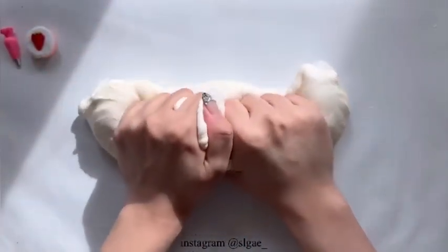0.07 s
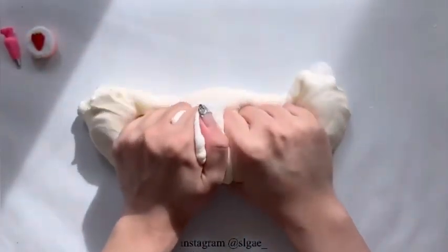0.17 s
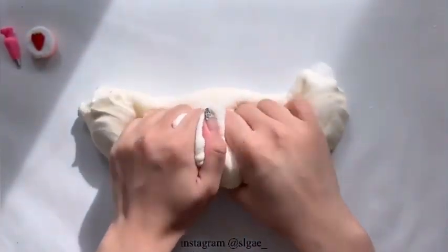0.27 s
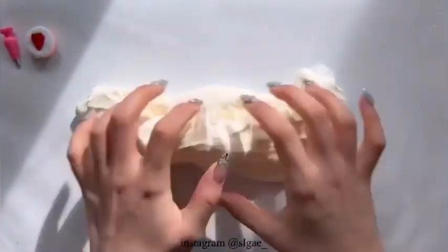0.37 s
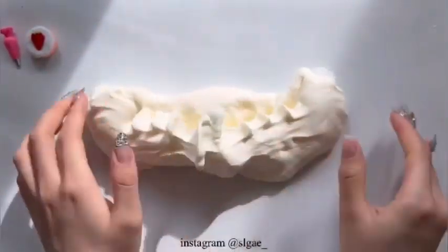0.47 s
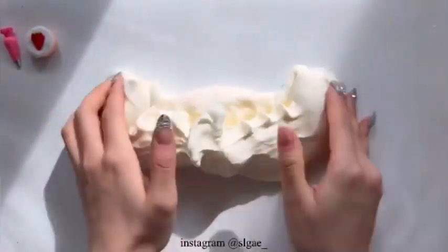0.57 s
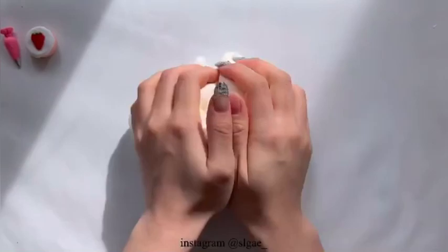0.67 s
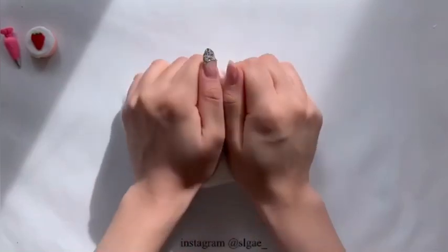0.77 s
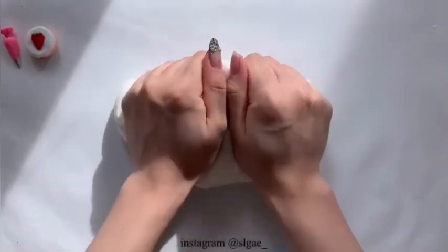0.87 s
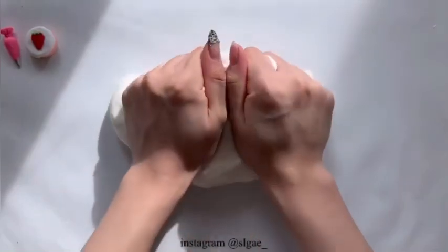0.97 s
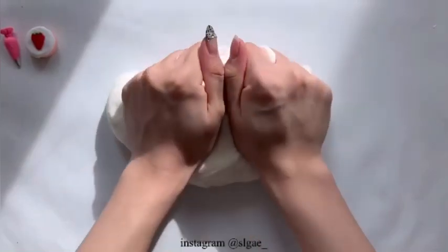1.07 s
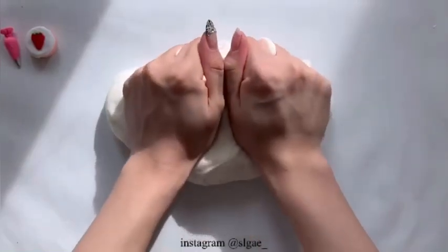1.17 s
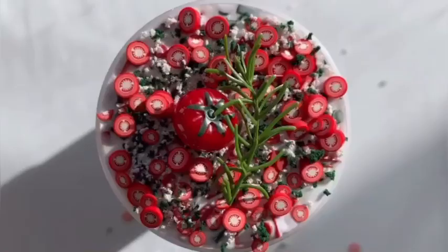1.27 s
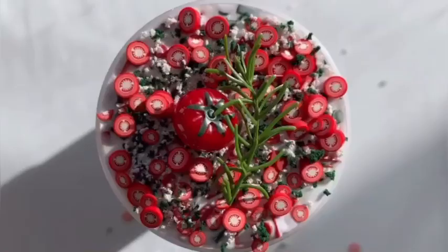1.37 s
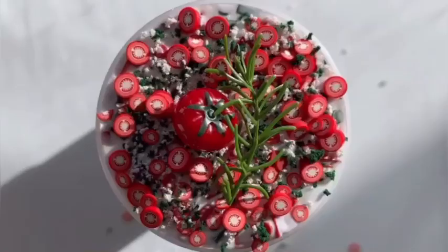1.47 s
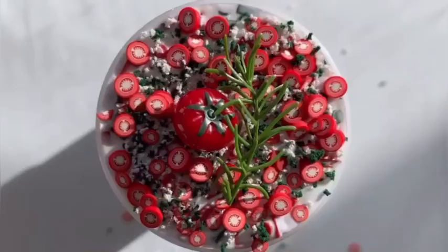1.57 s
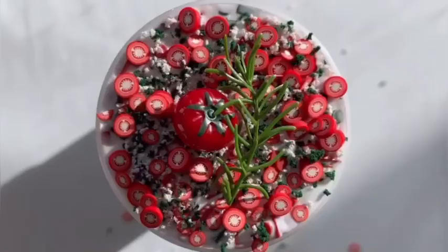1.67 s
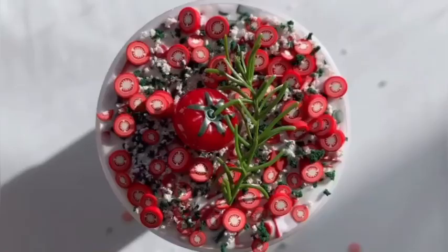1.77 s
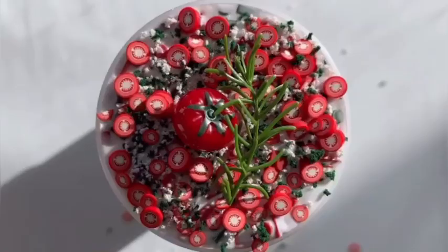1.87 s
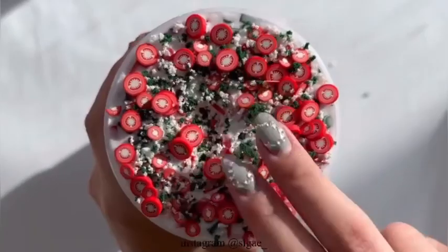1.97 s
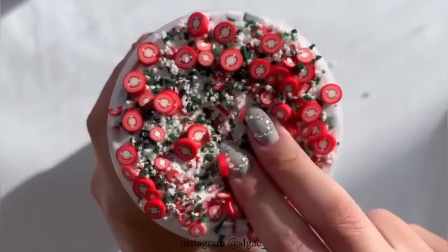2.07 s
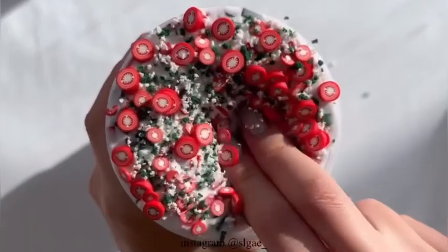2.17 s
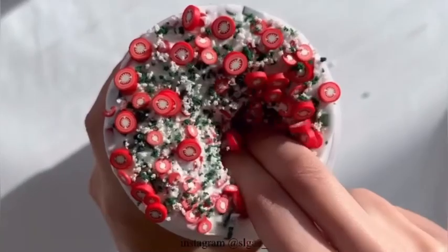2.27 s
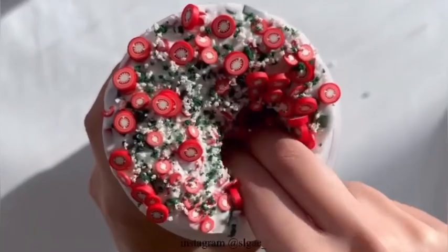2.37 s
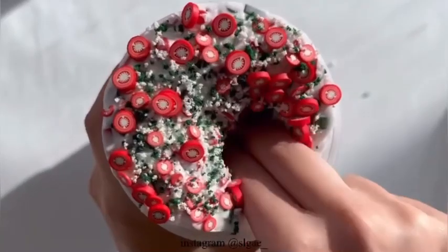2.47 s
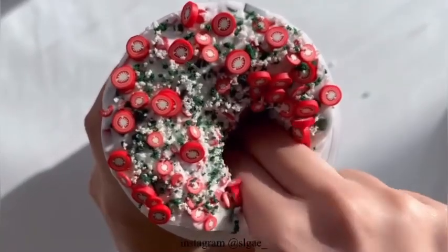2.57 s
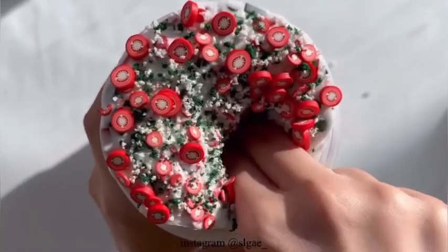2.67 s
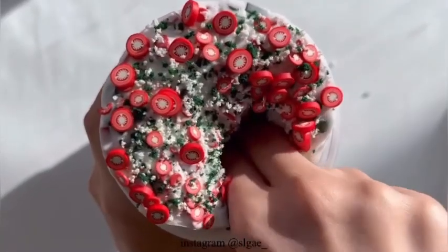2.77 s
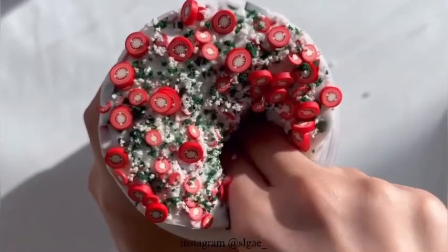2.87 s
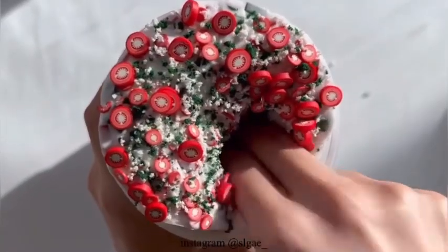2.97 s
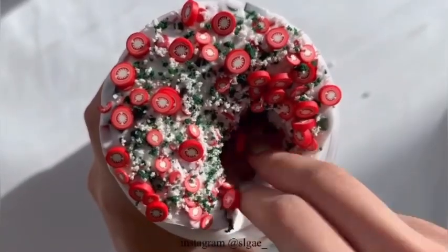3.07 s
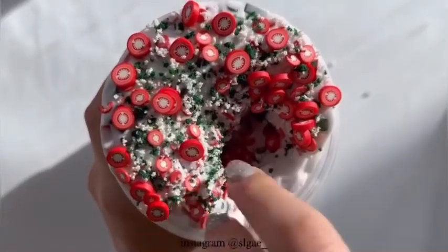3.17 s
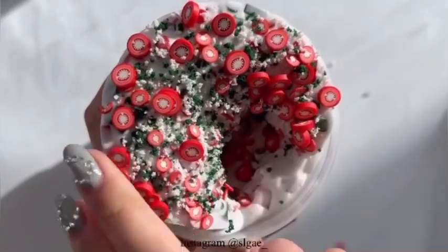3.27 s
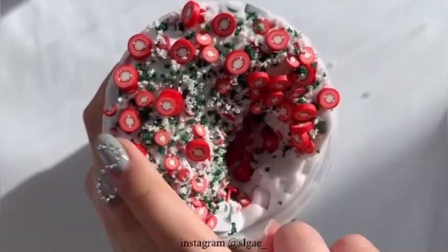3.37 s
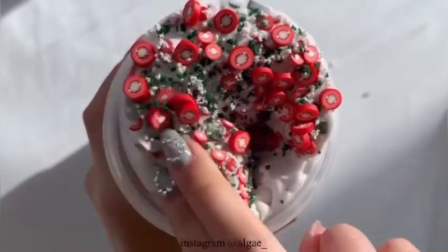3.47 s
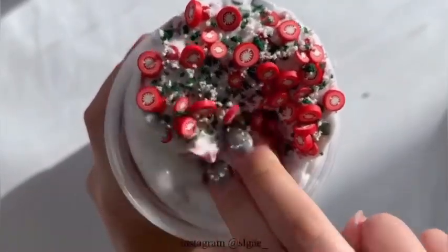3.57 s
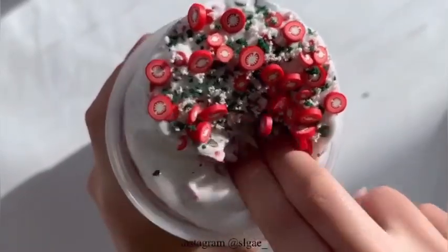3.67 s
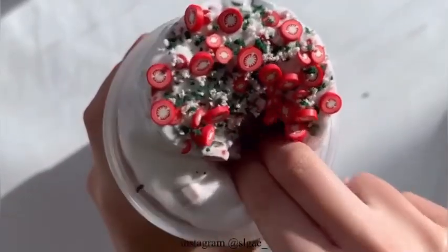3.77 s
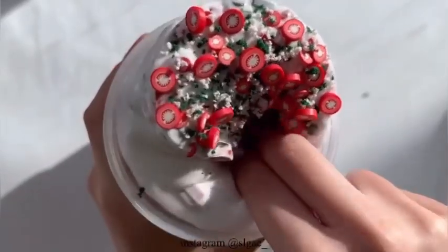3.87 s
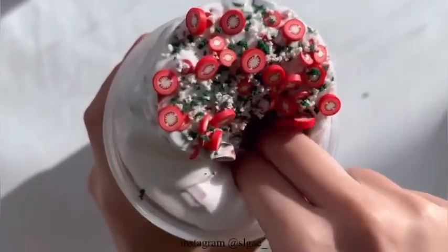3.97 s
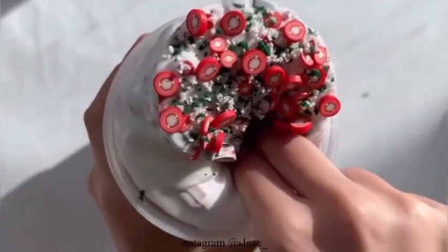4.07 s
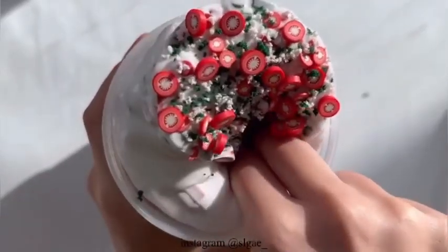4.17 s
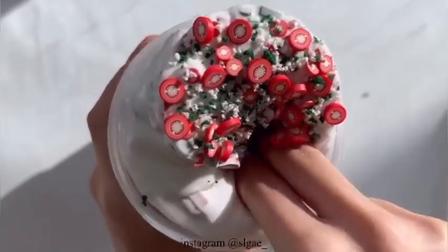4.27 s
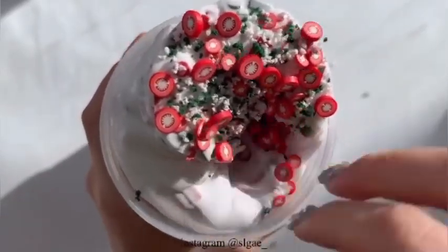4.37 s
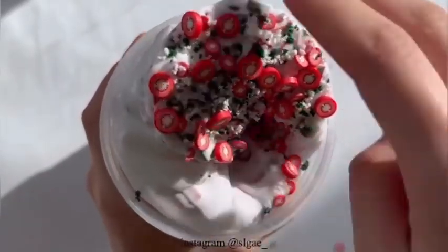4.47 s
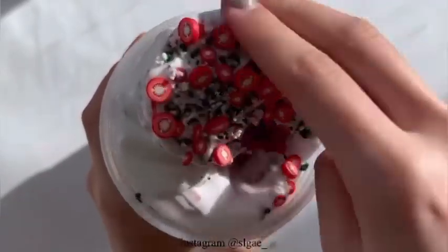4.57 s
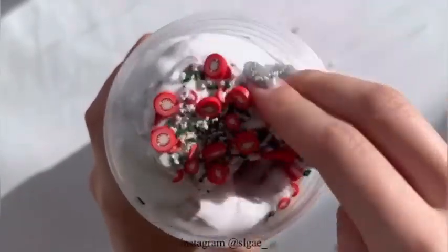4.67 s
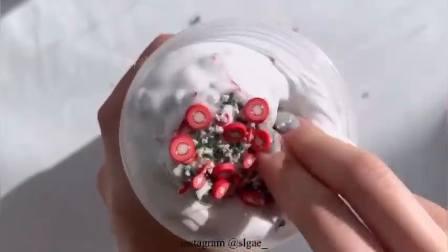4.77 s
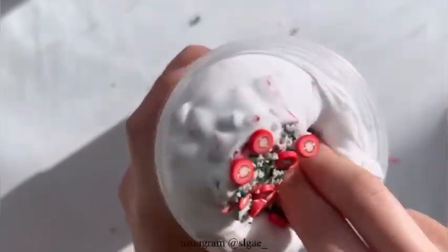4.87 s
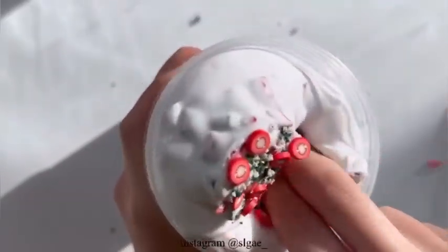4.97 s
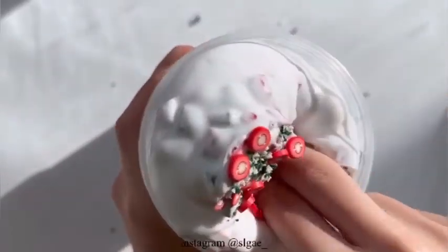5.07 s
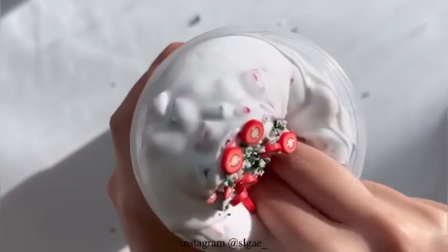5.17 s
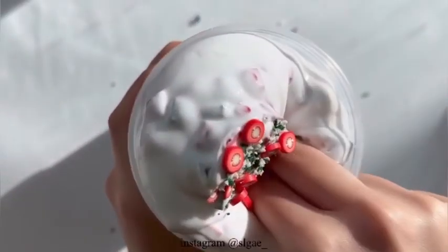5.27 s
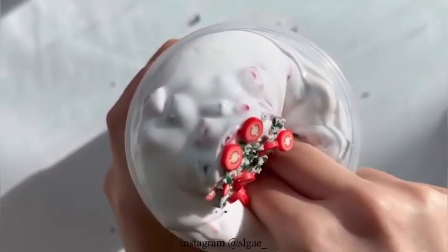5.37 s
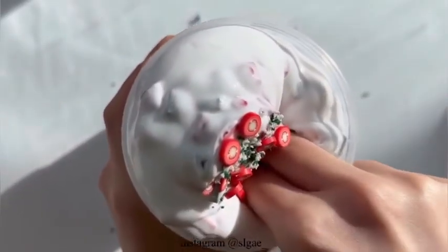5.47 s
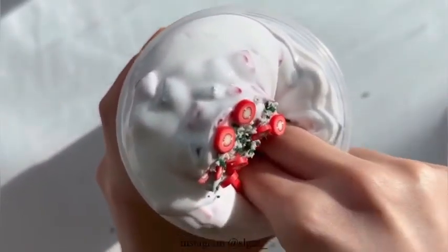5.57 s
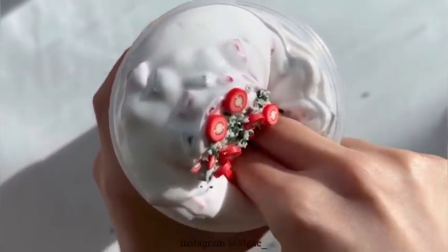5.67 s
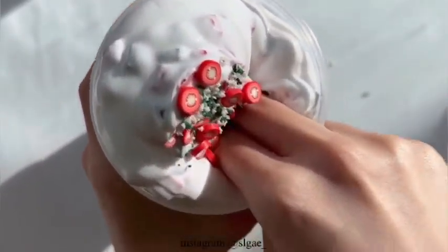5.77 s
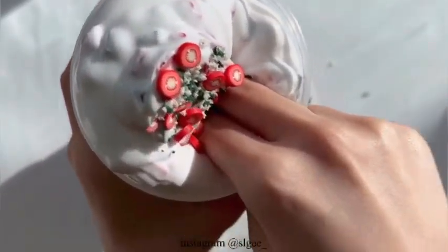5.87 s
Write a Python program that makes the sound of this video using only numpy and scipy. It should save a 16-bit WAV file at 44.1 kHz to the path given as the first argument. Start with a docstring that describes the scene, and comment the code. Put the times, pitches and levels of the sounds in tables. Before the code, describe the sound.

Thick slime squeezed on a table very close to the microphone: fizzing film tears, wet pops and deep hollow thumps over low squelch. It cuts to silence for a moment after one second. Then fingers poke slime in a hand-held cup, with finer gritty crackles, sticky clicks, soft thumps and a tiny air squirt, in a small dry room with faint low hum.

```python
"""Slime on a table, heard close up through two microphone ports, over a low room rumble with a hum.
First, hands knead a thick slab: pockets pop as damped rings, deep ones thump, torn films fizz as noise grains.
A muted cut falls silent at about 1.1 s. Then fingers poke slime in a hand-held cup: more pops and thumps,
grittier fizz, and at 3.2 s a short falling squirt of air. Noise swells low as the mass squelches in both parts."""
import sys
import numpy as np
from scipy import signal
from scipy.fft import rfft, irfft
from scipy.io import wavfile
from scipy.ndimage import uniform_filter1d

SR = 44100
rng = np.random.default_rng(int(sys.argv[2]) if len(sys.argv) > 2 else 0)


def master_out(mix):
    """Clip the mix to full scale and print it as 16-bit PCM to the path in sys.argv[1]."""
    frames = np.transpose(np.atleast_2d(mix))
    ceiling = np.clip(frames, -1, 1)
    pcm = np.round(ceiling * 32767).astype(np.int16)
    wavfile.write(sys.argv[1], SR, pcm)


N = 261072


def amp(db):
    """Decibels to gain."""
    return 10 ** (np.asarray(db) / 20)


def evened(x):
    """Scales to rms 1."""
    return x / np.sqrt(np.mean(x ** 2) + 1e-20)


def read(points, hz):
    """Reads a (frequency, value) table on a log frequency axis."""
    table_hz, value = np.transpose(points)
    return np.interp(np.log(hz + 1), np.log(table_hz + 1), value)


def curve(rows):
    """Columns of a (time, value, ..) table at every sample."""
    time_s, *columns = np.transpose(rows)
    return [np.interp(np.arange(N) / SR, time_s, column) for column in columns]


def add(mix, start_s, sound):
    """Mixes a sound in at its start time."""
    part = mix[max(round(start_s * SR), 0):][:len(sound)]
    part += sound[:len(part)]


def colour(x, points):
    """Gives x the tilt of a spectrum table, then rms 1."""
    hz = np.fft.rfftfreq(len(x), 1 / SR)
    return evened(irfft(rfft(x) * amp(read(points, hz)), len(x)))


def band(x, lo_hz, hi_hz, order=2):
    """Causal band-pass."""
    edges = [lo_hz, min(hi_hz, SR / 2.1)]
    return signal.sosfilt(signal.butter(order, edges, btype="band", fs=SR, output="sos"), x)


# Spectrum of the rumble in the room: pitch_hz [Hz], level_db [relative dB per Hz]
RUMBLE_SPECTRUM = [(20, -37.5), (30, -24.5), (42, -12), (61, -5.5), (72, 0), (86, -8.5), (120, -7.5),
                   (147, -23), (216, -25.5), (320, -33.5), (580, -30), (800, -41), (1300, -44), (3000, -68)]
RUMBLE_DB, HUM_DB = -47, -48.5  # rms levels
HUM_HZ, WAVER_HZ = 61.7, 3.5  # mean pitch and rms pitch deviation


def rumble():
    """Steady low noise of the room with a hum in it whose pitch wavers at random."""
    waver = evened(uniform_filter1d(uniform_filter1d(rng.standard_normal(N), 2500), 2500))
    hum = np.sqrt(2) * np.sin(2 * np.pi * np.cumsum(HUM_HZ + WAVER_HZ * waver) / SR)
    noise = colour(rng.standard_normal(N), RUMBLE_SPECTRUM)
    return amp(RUMBLE_DB) * noise + amp(HUM_DB) * hum


# Decay of the room: pitch_hz [Hz], t60_s [s]
ROOM_DECAY = [(500, 0.095), (2500, 0.14), (8000, 0.088)]


def room(x):
    """Sparse taps of random sign whose bands die at their own speed."""
    taps = np.zeros(SR // 4)
    at = np.arange(100, SR // 4 - 20, 20)
    taps[at + rng.integers(0, 20, len(at))] = rng.choice([-1., 1.], len(at))
    hz, t, bins = signal.stft(taps, SR, nperseg=256)
    fading = bins * amp(-60 * t / read(ROOM_DECAY, hz)[:, None])
    tail = signal.istft(fading, SR, nperseg=256)[1]
    return signal.fftconvolve(x, tail / np.linalg.norm(tail))[:N]


# The hole round the fingers, resounding with fizz and pops: time_s [s], pitch_hz [Hz], gain_db [dB]
HOLE = [(2.0, 2460, -11.5), (2.25, 2380, 0), (2.72, 2560, 2), (2.84, 1510, 10.5), (3.38, 1590, 6.5),
        (3.5, 2450, -12), (4.9, 2510, 5), (5.2, 2000, -24)]


def hollow(x, width_hz=180):
    """A resonance that follows the size of the hole: shift down, smooth, shift back."""
    hz, gain_db = curve(HOLE)
    turn = np.exp(2j * np.pi * np.cumsum(hz) / SR)
    r = np.exp(-np.pi * width_hz / SR)
    smooth = signal.lfilter([1 - r], [1, -r], x / turn)
    return amp(gain_db) * 2 * (turn * smooth).real


# Slow fizz of the settling mass: time_s [s], fizz_db [dB], treble_db [dB over fizz]
SETTLING = [(0.0, -49, -11.5), (0.27, -70.5, -5.5), (0.5, -39.5, -10), (0.76, -53.5, -10), (0.9, -68.5, -6),
            (1.3, -80, -6.5), (1.83, -77, -6.5), (2.03, -57.5, 4), (2.52, -59.5, -8.5), (2.75, -83, 4.5),
            (3.17, -79, 1), (3.43, -56, 6.5), (3.7, -55.5, -1.5), (4.06, -69.5, -6), (4.25, -62, 1),
            (4.47, -68, 0), (4.54, -56.5, 9), (4.72, -51, 0), (4.85, -60.5, 3.5), (5.07, -59, -13.5),
            (5.28, -80, -8), (5.69, -61.5, -5.5), (5.78, -73, -2.5), (5.92, -73, -16)]
# Films tearing in one go: peak_s [s], fizz_db [dB], treble_db [dB over fizz],
# swell_s and fade_s [s per 20 dB, short ones held to a floor]
FILM_TEARS = [(0.116, -33, -9.5, 0.09, 0.064), (0.302, -26, -12.5, 0.0035, 0.12),
              (0.432, -31.5, 0.5, 0.0042, 0.042), (0.454, -25, -7.5, 0.048, 0.027),
              (0.574, -45.5, -11, 0.035, 0.12), (0.692, -37, -9.5, 0.041, 0.15),
              (1.07, -48.5, -5, 0.15, 0.12), (1.49, -73.5, 3.5, 0.044, 0.067),
              (1.859, -45, -7, 0.012, 0.031), (2.088, -33, -13, 0.02, 0.018),
              (2.205, -51.5, 3, 0.14, 0.095), (2.859, -43, 1.5, 0.056, 0.073),
              (3.272, -49.5, 1, 0.015, 0.033), (3.332, -59, 3, 0.16, 0.052), (3.832, -51.5, -8, 0.48, 0.04),
              (4.135, -48.5, -3, 0.042, 0.06), (4.17, -42, 5.5, 0.046, 0.05),
              (4.502, -23, 2, 0.0036, 0.037), (4.666, -24.5, -7, 0.0048, 0.036),
              (5.143, -49, -10.5, 0.042, 0.052), (5.373, -52.5, -13, 0.08, 0.39),
              (5.597, -56.5, -15, .05, 0.068)]


def tearing():
    """Gains of fizz and its treble: each tear swells to its peak and fades, over the settling mass."""
    fizz_db, treble_db = curve(SETTLING)
    low_power, high_power = amp(2 * fizz_db), amp(2 * (fizz_db + treble_db))
    t = np.arange(N) / SR
    for peak_s, db, treble_db, swell_s, fade_s in FILM_TEARS:
        away = np.maximum((peak_s - t) / max(swell_s, .004), (t - peak_s) / max(fade_s, .01))
        power = amp(2 * db - 2 * 20 * away)
        low_power = low_power + power
        high_power = high_power + power * amp(2 * treble_db)
    return np.sqrt(low_power), np.sqrt(high_power)


def crackle(per_s, spread_db, cycles, lo_hz, hi_hz, count=24):
    """Tiny random bursts of many pitches; few are large."""
    size = amp(spread_db * np.minimum(rng.exponential(1, N), 4)) * (rng.random(N) < per_s / SR)
    kind, out = rng.integers(0, count, N), np.zeros(N)
    for k, hz in enumerate(np.geomspace(lo_hz, hi_hz, count)):
        u = np.arange(int(6 * cycles * SR / hz)) * hz / SR  # time in cycles
        grain = np.sin(2 * np.pi * u) * np.exp(-u / cycles)
        out += signal.oaconvolve(size * (kind == k), grain / np.linalg.norm(grain))[:N]
    return evened(out)


def patchy(x, patchy_db=1.8):
    """The fizz's level drifts at random in short patches of pitch and time."""
    bins = signal.stft(x, nperseg=256)[2]
    patches = uniform_filter1d(rng.standard_normal(bins.T.shape), size=10, axis=0)
    patches = uniform_filter1d(patches, size=5, axis=1)
    return signal.istft(bins * amp(patchy_db * evened(patches).T), nperseg=256)[1][:N]


# Spectrum of the fizz, before body and treble are levelled apart: pitch_hz [Hz], level_db [relative dB per Hz]
FIZZ_SPECTRUM = [(290, -22), (500, 0), (637, 0), (1030, -5), (1500, -6), (5620, -7), (9010, -3.5),
                 (9980, -21), (10500, -41)]
# Grit of the fizz, from smooth hiss to separate ticks: time_s [s], share [0-1]
GRIT_SHARE = [(0, .35), (1.3, .3), (1.82, .05), (1.9, .9), (4.49, .9), (4.51, .4), (4.7, .6), (4.95, .8),
              (5.2, .4), (5.92, .3)]
# Spectrum of the squelch, shaping lumpy noise: pitch_hz [Hz], level_db [relative dB per Hz]
SQUELCH_SPECTRUM = [(65, -52.5), (110, -10), (232, 1.5), (332, -7), (382, 1), (474, -17), (800, -9),
                    (1200, -80)]
# Low squelch of the moving mass, one list for the slab and one for the cup: time_s [s], level_db [dB]
PRESSES = [
    [(0.01, -56), (0.666, -44), (1.05, -60.5)],
    [(1.45, -73.5), (1.78, -62), (2.25, -37.5), (2.7, -55.5), (3.19, -59.5), (3.75, -45), (4.52, -61.5),
     (4.66, -48), (5.92, -56)],
]


def knead():
    """Fizz of tearing films over a soft hiss, and the low squelch of the moving mass."""
    low, treble = tearing()
    grit = curve(GRIT_SHARE)[0]
    ticks = crackle(2200, 4.2, 1.5, 1100, 5500)
    grains = grit * ticks + np.sqrt(1 - grit ** 2) * rng.standard_normal(N)
    spectrum = rfft(colour(patchy(grains), FIZZ_SPECTRUM))
    high = 1 / (1 + (5000 / (np.fft.rfftfreq(N, 1 / SR) + 1)) ** 10)  # splits body from treble at 5 kHz
    body = evened(irfft(spectrum * (1 - high), N))
    bright = evened(irfft(spectrum * high, N))
    fizz = low * (body + hollow(body)) + treble * bright
    lumps = crackle(300, 2.5, 2, 130, 600) + .8 * rng.standard_normal(N)
    return fizz + amp(curve(np.concatenate(PRESSES))[0]) * colour(lumps, SQUELCH_SPECTRUM)


# Air hissing out of a narrow slit: start_s [s], end_s [s], level_db [dB before the swell],
# from_hz [Hz], to_hz [Hz]
SLIT = (3.243, 3.28, -31, 7310, 5808)


def squirt():
    """A fluttering hiss in one falling resonance that swells and is cut off as the slit bursts."""
    start_s, end_s, db, from_hz, to_hz = SLIT
    out, u = np.zeros(N), np.linspace(0, 1, round((end_s - start_s) * SR))
    noise = rng.standard_normal((3, 2000))[:, :len(u)]
    narrow = band(noise[0] + 1j * noise[1], 20, 670)
    turn = np.exp(2j * np.pi * np.cumsum(from_hz + (to_hz - from_hz) * u) / SR)
    flutter = amp(3.6 * evened(uniform_filter1d(noise[2], 40)))
    hiss = evened(flutter * (narrow * turn).real)
    swell = u * np.minimum((1 - u) * 20, 1)
    add(out, start_s, amp(db) * swell * hiss)
    return out


# Modes rung by thumps on the table, then in the hand-held cup:
# pitch_hz [Hz], level_db [dB against the cavity before the swell], t60_s [s]
TABLE_MODES = [(307, -22, 0.24), (370, -17, 0.1), (567, -9, 0.016), (963, -9, 0.015)]
CUP_MODES = [(375, -33, .15), (600, -14, .02), (950, -22, .03)]
# Deep pockets and finger blows: start_s [s], peak_db [dB before overload], pitch_hz [Hz, once settled],
# t60_s [s, held to a floor]
DEEP_POCKETS = [(0.026, -27.5, 231, 0.029), (0.057, -26, 324, 0.01), (0.099, -28.5, 328, 0.029),
                (0.302, -21.5, 374, 0.057), (0.463, -18, 295, 0.037), (0.503, -27.5, 305, 0.029),
                (0.564, -23.5, 379, 0.038), (0.686, -15, 405, 0.07), (0.687, -6.5, 307, 0.041),
                (0.751, -23, 425, 0.035), (1.857, -27, 150.4, 0.07), (1.969, -29, 195, 0.045),
                (2.086, -31.5, 384, 0.082), (2.202, -34, 224, 0.063), (2.309, -37, 229, 0.054),
                (2.337, -29, 187, 0.012), (2.858, -29.5, 236, 0.032), (3.201, -48.5, 370, 0.12),
                (3.96, -31, 200, 0.026), (4.132, -31, 161, 0.15), (4.15, -20, 184, 0.046),
                (4.184, -19.5, 233, 0.04), (4.501, -32.5, 265, 0.034), (4.666, -27, 307, 0.053),
                (4.692, -20, 247, 0.051), (4.768, -31, 302, 0.064), (4.821, -36.5, 258, 0.052),
                (5.016, -23.5, 230, 0.049), (5.12, -36, 222.5, 0.026), (5.453, -25, 217, 0.033),
                (5.592, -11, 217.5, 0.05), (5.706, -25, 215.7, 0.042), (5.8, -24.5, 217, 0.029)]
PUSH_DB, PUSH_RATIO, PUSH_S = -4.5, .7, 0.0042  # level, multiple of the cavity pitch, decay time


def thumps():
    """The cavity swells for some ms while its pitch sags to rest; the mass lurches, table or cup rings on."""
    out, t = np.zeros(N), np.arange(9000) / SR

    def ringing(modes):
        """Sum of decaying sines."""
        return sum(amp(db - 60 * t / t60) * np.sin(2 * np.pi * hz * t) for hz, db, t60 in modes)

    table, cup = ringing(TABLE_MODES), ringing(CUP_MODES)
    for start_s, peak_db, hz, t60 in DEEP_POCKETS:
        turns = np.cumsum(hz * (1 + 2.6 * np.exp(-t / 0.0014))) / SR
        cavity = np.sin(2 * np.pi * turns) * amp(-60 * t / max(t60, .01))
        push = amp(PUSH_DB) * np.sin(2 * np.pi * PUSH_RATIO * hz * t) * np.exp(-t / PUSH_S)
        under = cup if start_s > MUTED_CUT[1] else table
        thump = (1 - np.exp(-t / 0.022)) * (cavity + push + under)
        add(out, start_s, amp(peak_db) * thump / abs(thump).max())
    return out


# Bursting pockets: start_s [s], peak_db [dB before overload], pitch_hz [Hz],
# treble_db [dB, bright crack of the tearing film against the ring], t60_s [s, held to a floor]
POCKETS = [(0.3031, -18.5, 750, -4, 0.013), (0.461, -8.5, 2490, -24, 0.0081),
           (0.502, -12, 3060, -21, 0.024), (0.5425, -16, 7030, -18, 0.017), (0.5637, -11, 2000, -8, 0.0025),
           (0.5995, -18, 935, -8.5, 0.02), (0.611, -23, 1110, -28, 0.013),
           (0.6555, -24.5, 7700, -11, 0.0053), (0.685, -5.5, 1133, -11, 0.023),
           (0.7503, -13, 780, -1.5, 0.028), (0.812, -33, 717, 2, 0.067), (0.837, -32.5, 915, -9, 0.012),
           (0.952, -30, 6270, -4, 0.01), (1.8509, -33, 786, 6, 0.019), (1.9193, -24, 1890, -8.5, 0.002),
           (1.944, -34, 3570, 0, 0.0038), (1.993, -19, 9700, -28, 0.0083), (2.054, -23, 5770, -9, 0.0046),
           (2.073, -30, 6400, -11, 0.014), (2.0833, -9, 1170, -2, 0.0033),
           (2.0865, -17.5, 3140, -14, 0.0039), (2.0953, -11, 3120, -7, 0.0011),
           (2.099, -9, 3020, 1.5, 0.003), (2.108, -28, 3830, -16, 0.0087), (2.135, -24.5, 5100, 5, 0.0066),
           (2.1625, -18, 8700, 1, 0.0059), (2.197, -7, 2450, -22.5, 0.011),
           (2.2156, -19, 2000, -23, 0.0017), (2.233, -28.5, 5940, -23, 0.011),
           (2.282, -22, 1800, -36, 0.0055), (2.3033, -29.5, 1920, -23, 0.0075),
           (2.323, -31, 1716, -17, 0.028), (2.342, -32, 1750, -32, 0.0071), (2.3571, -38, 2340, -32, 0.03),
           (2.434, -29.5, 1600, -42, 0.01), (2.455, -36, 3020, -13, 0.0081), (2.51, -40, 2850, -11, 0.01),
           (2.577, -34, 2080, -20, 0.0089), (2.6229, -40, 1256, -14.5, 0.01),
           (2.7996, -27.5, 2440, -18.5, 0.011), (2.8517, -16, 1890, -5.5, 0.0034),
           (2.871, -11.5, 6800, -29, 0.009), (2.914, -32, 3730, 1, 0.012), (3.014, -29, 1480, -5, 0.023),
           (3.0195, -18, 1590, -0.5, 0.01), (3.037, -25.5, 1580, 9, 0.0043), (3.169, -40, 5780, -29, 0.032),
           (3.196, -37, 950, -11, 0.017), (3.2788, -24, 6050, -22, 0.0079),
           (3.3569, -24.5, 6520, -18, 0.011), (3.361, -29.5, 1630, -11, 0.019),
           (3.4011, -22.5, 1510, 0.5, 0.014), (3.4254, -12.5, 1750, -2.5, 0.017),
           (3.4405, -28, 3030, -18, 0.0038), (3.4661, -27, 3020, -4, 0.015),
           (3.4782, -21.5, 2620, -4.5, 0.014), (3.4892, -25, 3950, -9, 0.021),
           (3.5207, -13, 4400, -31, 0.0034), (3.5457, -29.5, 2410, -19, 0.008),
           (3.573, -25.5, 3700, -27, 0.0079), (3.61, -31, 3000, -22, 0.0056),
           (3.636, -31, 3780, -17, 0.0091), (3.6424, -26, 2950, -11, 0.0073),
           (3.6952, -34, 4340, -16, 0.012), (3.705, -37, 2300, 3, 0.008), (3.771, -35, 2010, -25, 0.006),
           (3.78, -28.5, 2260, -19, 0.014), (3.8054, -18.5, 2510, -4, 0.0078),
           (3.826, -31, 2160, -12, 0.01), (3.8368, -20, 9200, -28, 0.0066), (3.842, -34, 2180, -25, 0.0043),
           (3.901, -30.5, 2070, -8, 0.025), (3.952, -13, 1980, -15, 0.0017),
           (4.0806, -23, 2450, -14.5, 0.012), (4.1102, -33, 2360, -7, 0.11), (4.125, -25.5, 8800, 4, 0.022),
           (4.131, -14.5, 2240, -12, 0.01), (4.1412, -20, 1960, -7, 0.026),
           (4.1462, -19.5, 3200, -13, 0.032), (4.1697, -9, 4300, -9, 0.013),
           (4.2315, -30.5, 1700, -5, 0.012), (4.2667, -31.5, 3300, -1.5, 0.019),
           (4.2783, -36.5, 1870, 2, 0.016), (4.3579, -37, 1870, -33, 0.0096),
           (4.5004, 0.5, 3450, 4.5, 0.016), (4.568, -29.5, 1610, -19, 0.017), (4.59, -31, 1520, -15, 0.015),
           (4.597, -32.5, 2800, -19, 0.02), (4.614, -28, 4700, -22, 0.0092),
           (4.6656, -3.5, 7390, -3.5, 0.027), (4.691, -38, 2270, -23, 0.011),
           (4.7294, -19.5, 4300, -9, 0.011), (4.7559, -26.5, 5400, 4, 0.062),
           (4.7664, -20.5, 3970, -21, 0.012), (4.7727, -24.5, 5730, -9, 0.012),
           (4.8158, -28, 2870, -4, 0.0057), (4.8786, -24.5, 3200, -31, 0.0045),
           (4.904, -37, 2750, -15, 0.0069), (4.922, -32.5, 2520, -7, 0.0077),
           (5.0895, -39, 2130, -15, 0.037), (5.127, -33.5, 7630, -12, 0.0048),
           (5.1413, -23.5, 7660, -16.5, 0.0027), (5.5889, -25, 1914, -36.5, 0.014),
           (5.591, -21, 944, -39.5, 0.02), (5.699, -36, 860, -38.5, 0.03), (5.7943, -34, 900, -34, 0.022)]
SNAP_DB, SNAP_S = (-7.5, -24), 0.0025  # snap against ring (slab, cup), decay time
# The snap falls to SNAP_TO_HZ from above it by this multiple of the pocket pitch (6 kHz at most)
SNAP_FROM, SNAP_TO_HZ, SNAP_DROP_S = 1.5, 360, 0.0013


def pops():
    """A pocket's mouth whistles down, it rings a few cycles, its film tears as a wide and a bright crack."""
    out, t = np.zeros(N), np.arange(1800) / SR
    noises = rng.standard_normal((len(POCKETS), 3, len(t)))
    for (start_s, peak_db, hz, treble_db, t60), noise in zip(POCKETS, noises):
        shape = (1 - np.exp(-t / 0.00012)) ** 2 * amp(-60 * t / max(t60, .002))
        tone = np.sin(2 * np.pi * hz * t) * np.exp(-t * hz / 4)  # the wet wall damps it within some cycles
        breath = band(noise[0], hz / 1.45, hz * 1.282, order=3) * np.sqrt(SR / hz / 2)
        ring = shape * (tone + .5 * breath)
        wide = band(noise[1] * shape, hz / 3, hz * 2, order=4)
        bright = band(noise[2] * shape, 3800, 11000, order=4)
        drop_hz = SNAP_TO_HZ + min(SNAP_FROM * hz, 6000) * np.exp(-t / SNAP_DROP_S)
        snap = np.sin(2 * np.pi * np.cumsum(drop_hz) / SR) * np.exp(-t / SNAP_S) * np.minimum(t * hz, 1)
        snap_db = SNAP_DB[int(start_s > MUTED_CUT[1])]
        parts = [(0, ring), (-8, wide), (treble_db, bright), (snap_db, snap)]
        pop = sum(amp(part_db) * part / np.linalg.norm(part) for part_db, part in parts)
        add(out, start_s, amp(peak_db) * pop / abs(pop).max())
    return out


# Reflections that reach the ports unlike: pitch_hz [Hz], level_db [dB against the direct sound, before the turn]
SIDE_REFLECTIONS = [(60, -40), (200, -33), (400, -24), (750, -11), (1500, -17), (2800, -23), (5300, -13),
                    (10000, -24)]


def scene():
    """Slime close to the microphone, its room tail, the rumble, and near reflections from the sides."""
    bursts = pops()
    tail = amp(-15) * room(bursts + hollow(bursts))
    direct = bursts + thumps() + tail + knead() + squirt() + rumble()
    turned = 1j - .3  # mostly a phase shift between the sides, the right a little louder
    side_gain = amp(read(SIDE_REFLECTIONS, np.fft.rfftfreq(N, 1 / SR)))
    side = irfft(rfft(direct) * turned * side_gain, N)
    return np.array([direct + side, direct - side])


# Phase between the microphone ports: pitch_hz [Hz], lead [radians the left port leads]
PORT_LEAD = [(4500, 0), (5300, .2), (7400, -.5), (9500, -1.8)]
# Silence of the cut between slab and cup: start_s [s], end_s [s]
MUTED_CUT = (1.086, 1.272)
EDGE_HZ = 10300  # upper band limit


def record(dry):
    """Two close ports whose phase parts in the treble, soft overload, a muted cut, then the band limit."""
    half = np.exp(.5j * read(PORT_LEAD, np.fft.rfftfreq(N, 1 / SR)))
    ports = irfft(rfft(dry) * np.array([half, 1 / half]), N)
    ports = .9 * np.tanh(ports / .9)
    t = np.arange(N) / SR
    gate = np.clip(np.maximum((MUTED_CUT[0] - t) / 0.0037, (t - MUTED_CUT[1]) / 0.022), 0, 1)
    lowpass = signal.firwin(301, EDGE_HZ, window=("kaiser", 9), fs=SR)
    return signal.oaconvolve(ports * gate, lowpass[None], "same")


dry = scene()
out = record(dry)
master_out(out)
```